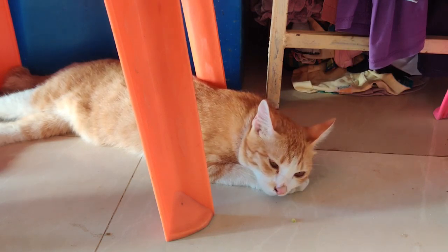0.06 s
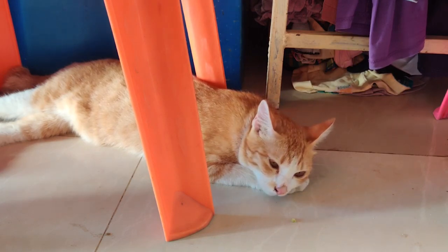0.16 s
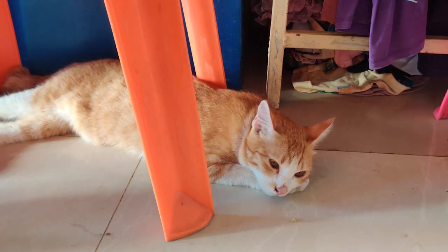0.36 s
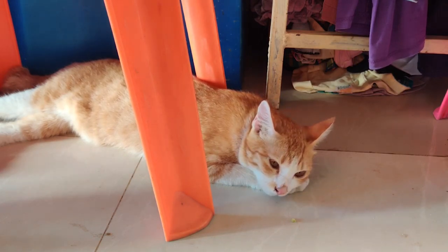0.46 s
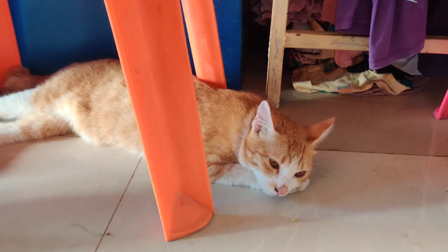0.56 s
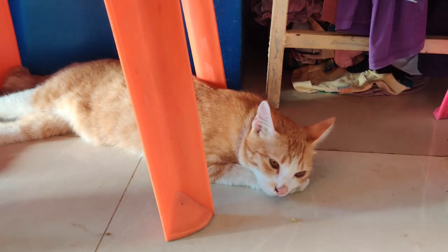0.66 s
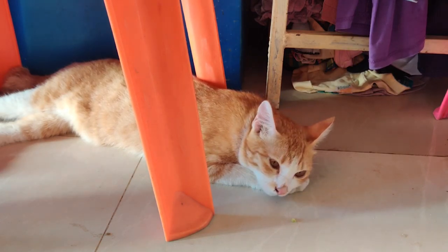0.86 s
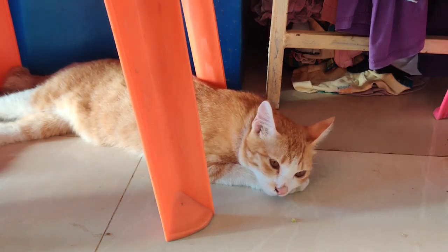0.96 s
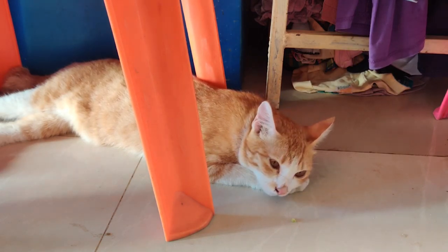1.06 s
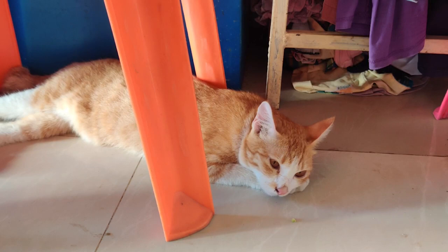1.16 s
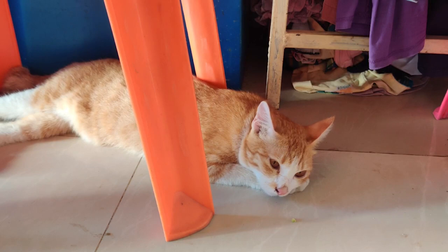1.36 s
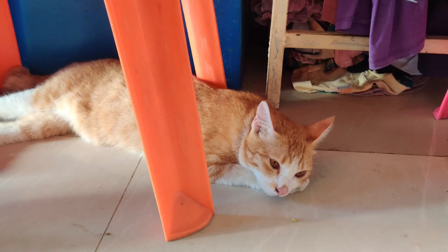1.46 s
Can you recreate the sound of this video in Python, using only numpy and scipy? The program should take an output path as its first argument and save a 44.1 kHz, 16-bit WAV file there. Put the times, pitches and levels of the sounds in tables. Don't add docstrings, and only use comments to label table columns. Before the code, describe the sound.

Two wet lip smacks from a cat, bright then duller, over a faint low hum indoors

```python
import sys
import numpy as np
from scipy import signal
from scipy.fft import rfft, irfft
from scipy.io import wavfile
from scipy.ndimage import uniform_filter1d

SR = 44100
rng = np.random.default_rng(int(sys.argv[2]) if len(sys.argv) > 2 else 0)


def gain_from_decibels(decibels):
    exponent = np.asarray(decibels, float) / 20
    return 10 ** exponent


def generate_wav(sig):
    pcm = np.round(np.clip(np.atleast_2d(sig).T, -1, 1) * 32767).astype(np.int16)
    wavfile.write(sys.argv[1], SR, pcm)


N = 66150


def evened(x):
    return x / np.sqrt(np.mean(x ** 2) + 1e-20)


def read(points, hz, column=1):
    table = np.transpose(points)
    return np.interp(np.log(hz + 1), np.log(table[0] + 1), table[column])


def add(mix, start_s, sound):
    part = mix[round(start_s * SR):][:len(sound)]
    part += sound[:len(part)]


def colour(x, gain):
    return irfft(rfft(x) * gain(np.fft.rfftfreq(len(x), 1 / SR)), len(x))


def cut(x, hz, kind, order):
    return signal.sosfilt(signal.butter(order, hz, kind, fs=SR, output="sos"), x)


# pitch_hz [Hz], level_db [dB], t60_s [s to fall 60 dB]
MOUTH_RINGS = [(680, -1, 0.0078), (1134, -7, .01), (1614, -2.5, 0.007), (2480, 2, 0.0031),
               (3200, -2.5, 0.0029), (3990, -8, 0.0046), (5250, -15.5, 0.0048)]


def mouth_rings(t, tilt_db):
    rings = np.zeros(len(t))
    for k, (pitch_hz, level_db, t60_s) in enumerate(MOUTH_RINGS):
        level = gain_from_decibels(level_db + tilt_db * np.log2(pitch_hz / 2000) - 60 * t / t60_s)
        rings += (-1) ** k * level * np.sin(2 * np.pi * pitch_hz * t)
    rise_s = 0.0001
    return rings * (1 - np.exp(-t / rise_s))


# pitch_hz [Hz], level_db [dB], t60_s [s]
JAW_THUMP = (251, -12, 0.025)


def jaw_thump(t):
    pitch_hz, level_db, t60_s = JAW_THUMP
    return gain_from_decibels(level_db - 60 * t / t60_s) * np.sin(2 * np.pi * pitch_hz * t)


# pitch_hz [Hz], level_db [dB per Hz]
SPIT_COLOUR = [(3000, -28), (5800, -8.5), (7200, -10), (8600, -26.5), (9800, -37.5), (13000, -40.5),
               (15500, -13)]


def spit_spray(t):
    t60_s = 0.002
    puff = colour(rng.standard_normal(len(t)), lambda hz: gain_from_decibels(read(SPIT_COLOUR, hz)))
    return gain_from_decibels(-60 * t / t60_s) * puff


# start_s [s], level_db [dB], brightness [dB per octave], spit_db [dB]
LIP_POPS = [
    (.2053, -9.5, 1.5, 0),
    (.8696, -13.5, -1, -14),
]


def lip_pops():
    body, jaw, spit = np.zeros(N), np.zeros(N), np.zeros(N)
    t = np.arange(1200) / SR
    for start_s, level_db, tilt_db, spit_db in LIP_POPS:
        add(body, start_s, gain_from_decibels(5 + level_db) * mouth_rings(t, tilt_db))
        add(jaw, start_s, gain_from_decibels(level_db) * jaw_thump(t))
        add(spit, start_s, gain_from_decibels(spit_db) * spit_spray(t))
    body = cut(body, 398, "high", order=3)
    body = cut(body, 5800, "low", order=6)
    return body + jaw + spit


# start_s [s], length_s [s], level_db [dB], brightness [dB per octave]
TONGUE_STROKES = [
    (.149, 0.15, -43, 2),
    (0.1512, 0.0039, -51, 1),
    (.347, 0.0023, -35, 8),
    (0.819, 0.14, -41.5, 1.5),
    (1.158, 0.079, -42.5, 4),
    (1.1606, 0.0026, -39, 6),
]
# pitch_hz [Hz], level_db [dB per Hz]
TONGUE_COLOUR = [(500, 17), (2000, 11.5), (5000, 7), (8000, -5.5), (15000, -8)]


def tongue_strokes():
    ticks_per_s, rise_s, fall_power = 5700, 0.001, 1.2
    bursts = (rng.random(N) < ticks_per_s / SR) * rng.exponential(1, N)
    ticks = rng.standard_normal(N) * (0.32 + bursts)
    t = np.arange(N) / SR
    strokes = np.zeros(N)
    for start_s, length_s, level_db, tilt_db in TONGUE_STROKES:
        rise = np.clip((t - start_s) / rise_s, 0, 1)
        fall = np.exp(-(abs(t - start_s) / length_s) ** fall_power)
        wet = colour(ticks, lambda hz: gain_from_decibels(read(TONGUE_COLOUR, hz) + tilt_db * np.log2(hz / 8000 + .05)))
        strokes += gain_from_decibels(level_db) * rise * fall * evened(wet)
    return strokes


TAIL_DB = 8.5
# pitch_hz [Hz], t60_s [s to fall 60 dB]
ROOM_DECAY = [(200, .4), (450, 0.52), (720, .27), (1500, 0.45), (2500, 0.47), (4000, 0.37), (7000, 0.32),
              (14000, 0.2)]


def room_tail():
    hold_s, rise_s, early_db, early_t60_s = 0.004, 0.004, -1, 0.12
    taps = np.zeros(SR // 2)
    at = np.arange(0, len(taps) - 10, 10) + rng.integers(0, 10, (len(taps) - 1) // 10)
    taps[at] = rng.choice([-1., 1.], len(at))
    hz, frame_s, z = signal.stft(taps, SR, nperseg=256)
    decay_db = -60 * np.maximum(frame_s - hold_s, 0) / read(ROOM_DECAY, hz)[:, None]
    tail = signal.istft(z * gain_from_decibels(decay_db), SR, nperseg=256)[1]
    t = np.arange(len(tail)) / SR
    tail = tail * (1 - np.exp(-t / rise_s))
    tail = tail * (1 + gain_from_decibels(early_db - 60 * t / early_t60_s))
    return gain_from_decibels(TAIL_DB) * tail / np.linalg.norm(tail)


# delay_s [s], sign [+1 or -1], level_db [dB]
FIRST_ECHOES = [(.0007, -1, -6), (.00195, 1, 0), (.0041, 1, -6), (.0082, 1, -7), (.0112, -1, -7),
                (.015, 1, -5)]


def near_room():
    near = room_tail()
    for delay_s, sign, level_db in FIRST_ECHOES:
        near[round(delay_s * SR)] += sign * gain_from_decibels(level_db)
    return near


def patchy(shape_db, patchy_db, size):
    frames, hz = N * 4 // size + 5, np.fft.rfftfreq(size, 1 / SR)
    a, b, patches = rng.standard_normal((frames, len(hz), 3)).T
    patches = uniform_filter1d(patches, size=8, axis=0)
    patches = evened(uniform_filter1d(patches, size=10, axis=1))
    frame_s = np.arange(frames) * size / 4 / SR
    z = (a + 1j * b) * gain_from_decibels(shape_db(hz[:, None], frame_s) + patchy_db * patches)
    noise = signal.istft(z, nperseg=size, noverlap=size * 3 // 4)[1]
    return evened(noise[:N])


# pitch_hz [Hz], width_hz [Hz], level_db [dB]
MOTOR_TONES = [(86.4, 5.9, -44.5), (110.3, 6.7, -49.5), (242.8, 45, -44.5)]


def motor():
    tones = np.zeros(N)
    for pitch_hz, width_hz, level_db in MOTOR_TONES:
        tone = colour(rng.standard_normal(N), lambda hz: 1 / (1 + (2 * (hz - pitch_hz) / width_hz) ** 2))
        tones += gain_from_decibels(level_db) * evened(tone)
    return tones


# pitch_hz [Hz], level_db [dB per Hz]
HUM_COLOUR = [(15, 0.5), (25, 1.5), (40, -23), (60, -5.5), (130, -13), (190, -15), (310, -26.5),
              (600, -47.5)]


def low_hum():
    return gain_from_decibels(-35.5) * patchy(lambda hz, t: read(HUM_COLOUR, hz) + 0 * t, patchy_db=0.9, size=4096)


# pitch_hz [Hz], level_db [dB per Hz]
WASH_COLOUR = [(180, -36), (300, -3.5), (1280, -4.5), (1390, -3.5), (1810, -10), (1930, -8), (4910, -11),
               (6100, -19.5), (16000, -41.5)]
# time_s [s], level_db [dB]
WASH_FADE = [(0, 0), (.4, 2), (.8, -1), (1.05, -3), (1.5, -5.5)]


def distant_wash():
    def shape_db(hz, t):
        fade_db = np.interp(t, *np.transpose(WASH_FADE)) / (1 + (hz / 3240) ** 2)
        return read(WASH_COLOUR, hz) + fade_db - 20 * (hz < 250)
    return gain_from_decibels(-39.5) * patchy(shape_db, patchy_db=1.0, size=1024)


def scene():
    pop, lick = lip_pops(), tongue_strokes()
    near, far = near_room(), room_tail()
    into_room = pop + gain_from_decibels(-4.5 - TAIL_DB) * lick
    left = pop + lick + signal.fftconvolve(into_room, near)[:N]
    left = left + motor() + low_hum() + distant_wash()
    right = left + gain_from_decibels(-3) * signal.fftconvolve(into_room, far)[:N]
    return np.array([left, right])


# pitch_hz [Hz], gain_db [dB], phase_rad [rad]
COVERED_PORT = [(20, -9, -.7), (70, -14.5, -1.1), (150, -17.5, -1.4), (300, -23, -2.4), (430, -34, -5.5),
                (900, -33, -6.4), (2200, -43, -7.5), (6000, -56, -9)]


def covered_port(x):
    return colour(x, lambda hz: gain_from_decibels(read(COVERED_PORT, hz)) * np.exp(1j * read(COVERED_PORT, hz, column=2)))


# pitch_hz [Hz], level_db [dB per Hz]
HISS_COLOUR = [(30, 31), (250, 3), (500, 4), (2000, -23.5), (5000, -57), (8500, -55), (12000, -16.5),
               (15000, -5.5)]


def port_hiss():
    return colour(rng.standard_normal(N), lambda hz: gain_from_decibels(read(HISS_COLOUR, hz) - 100) * np.sqrt(SR / 2))


def low_pass(x):
    return signal.sosfilt(signal.butter(12, 16820, fs=SR, output="sos"), x)


def record(dry):
    right = covered_port(dry[1]) + port_hiss()
    pair = [colour(x, lambda hz: hz < 15780) for x in (dry[0], right)]
    return low_pass(np.array(pair))


dry = scene()
out = record(dry)
generate_wav(out)
```